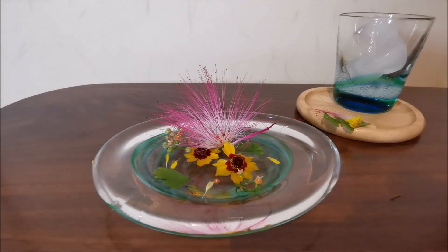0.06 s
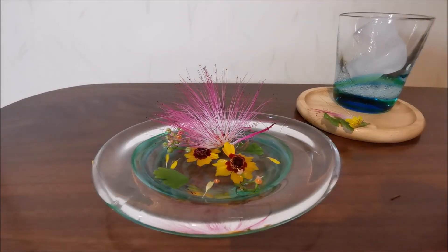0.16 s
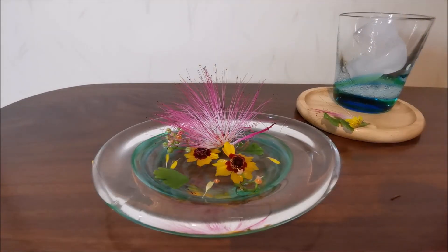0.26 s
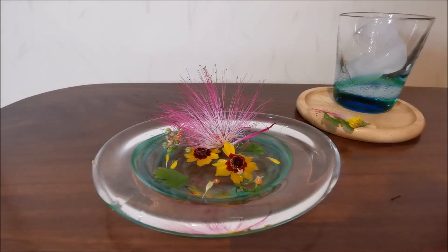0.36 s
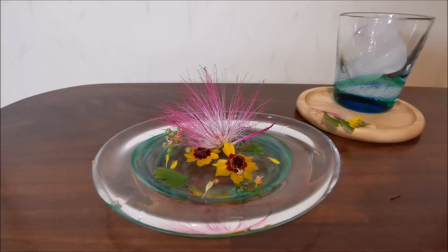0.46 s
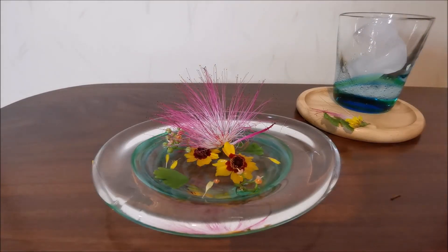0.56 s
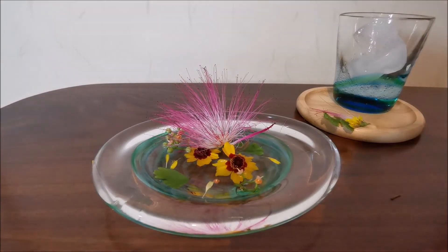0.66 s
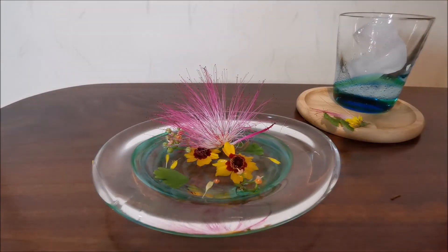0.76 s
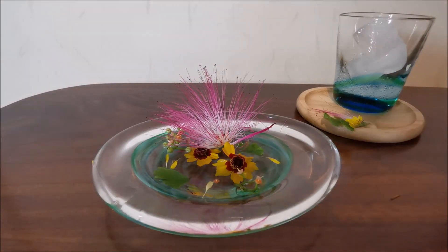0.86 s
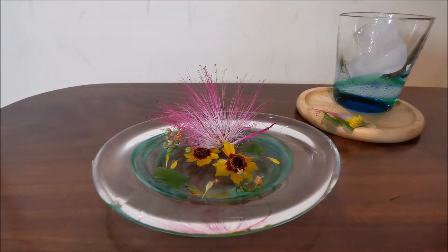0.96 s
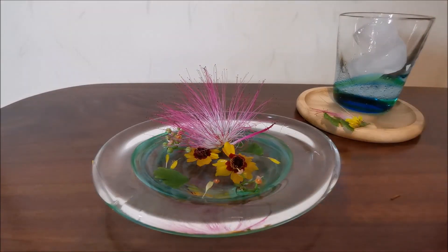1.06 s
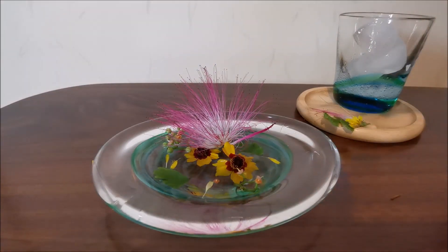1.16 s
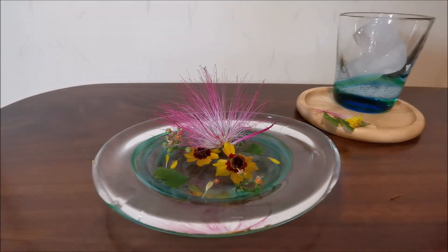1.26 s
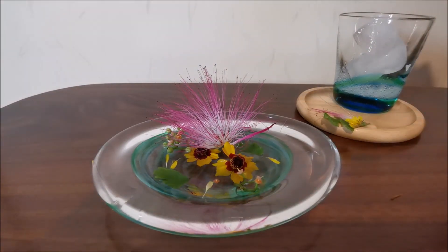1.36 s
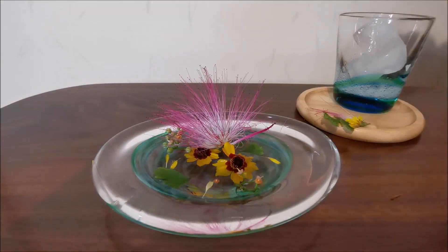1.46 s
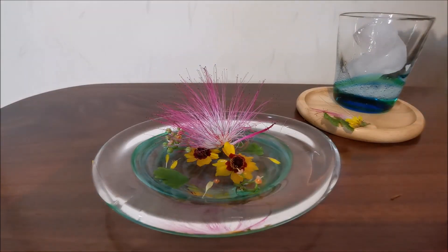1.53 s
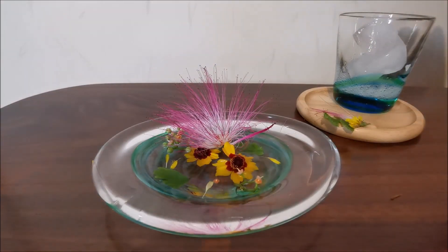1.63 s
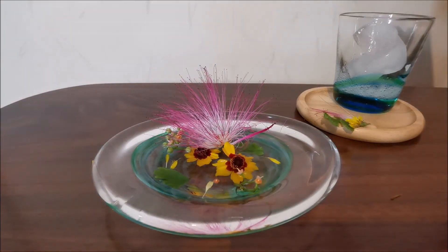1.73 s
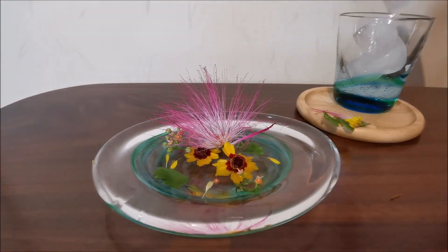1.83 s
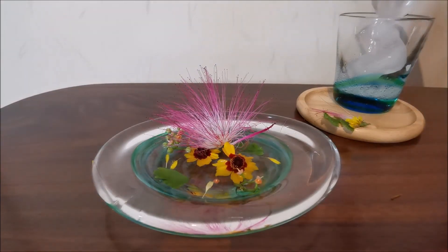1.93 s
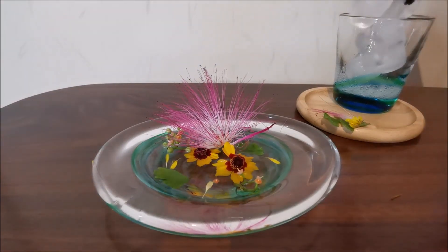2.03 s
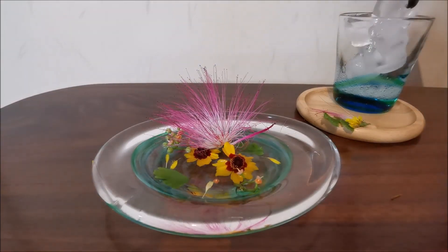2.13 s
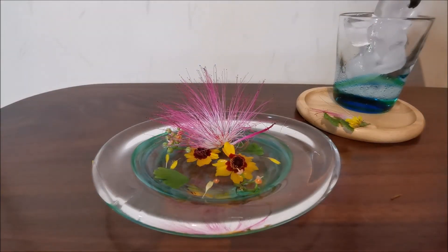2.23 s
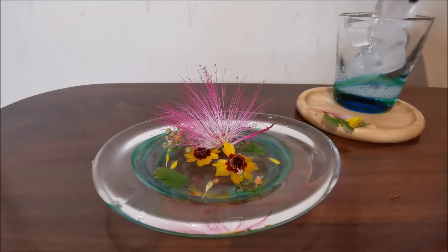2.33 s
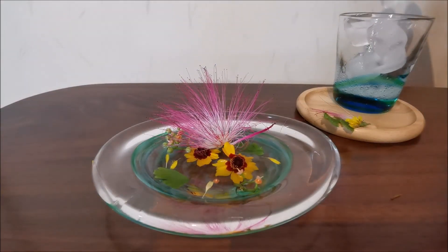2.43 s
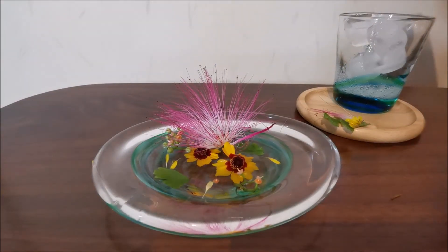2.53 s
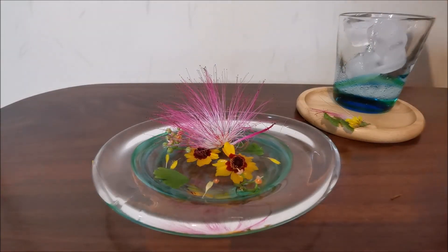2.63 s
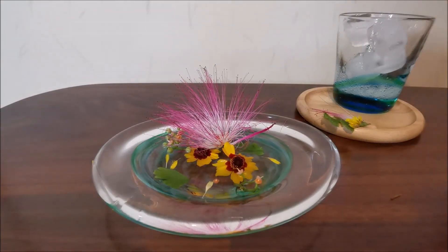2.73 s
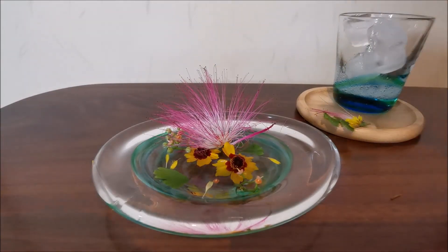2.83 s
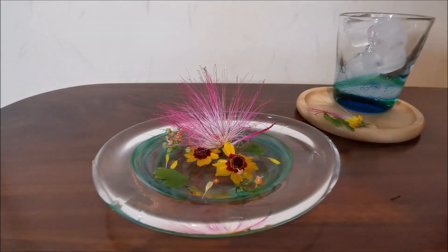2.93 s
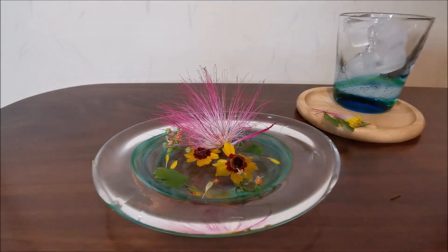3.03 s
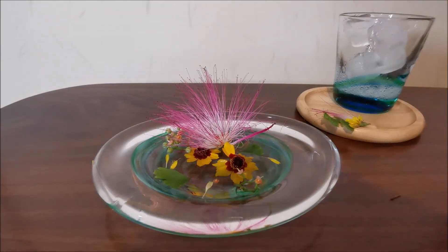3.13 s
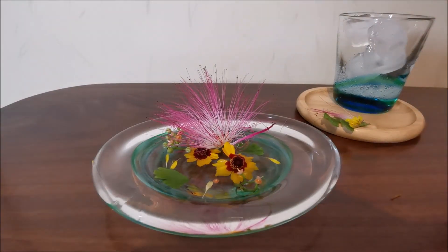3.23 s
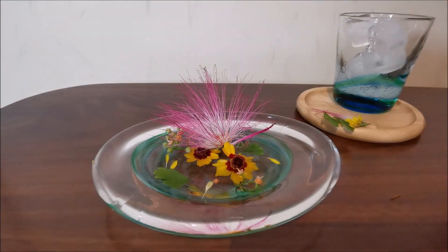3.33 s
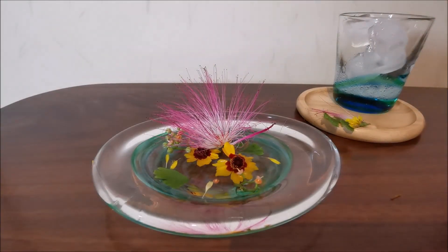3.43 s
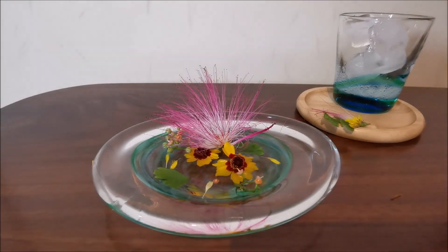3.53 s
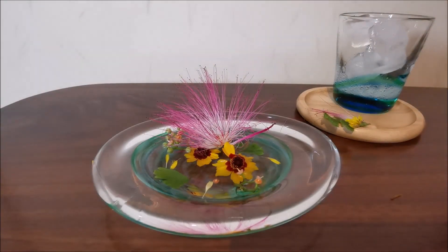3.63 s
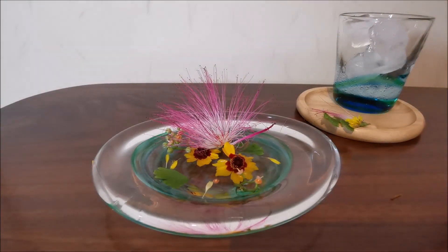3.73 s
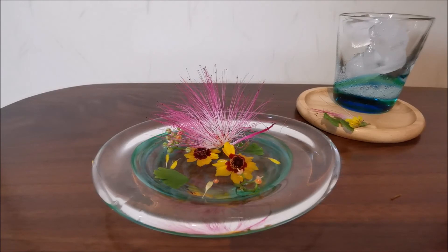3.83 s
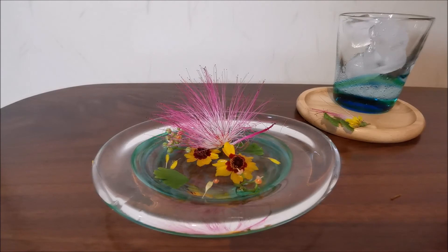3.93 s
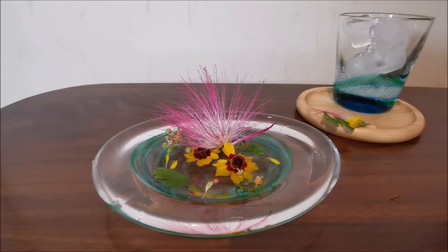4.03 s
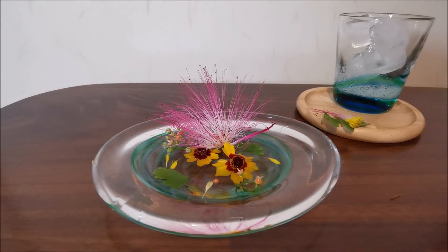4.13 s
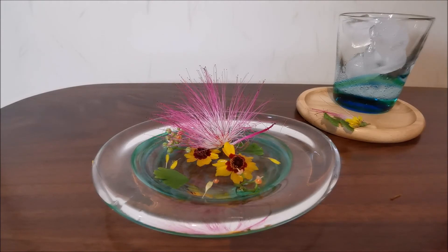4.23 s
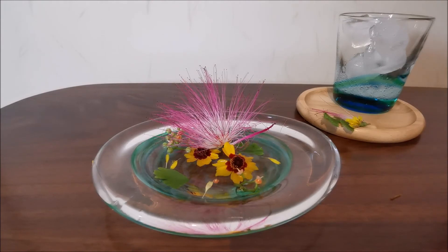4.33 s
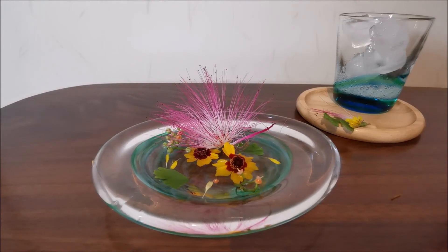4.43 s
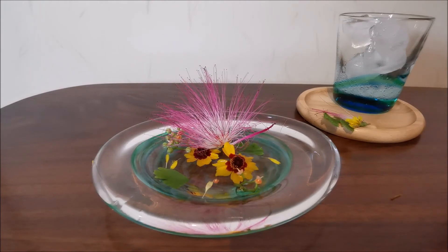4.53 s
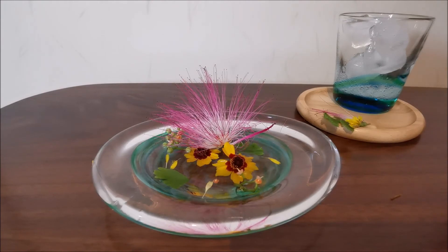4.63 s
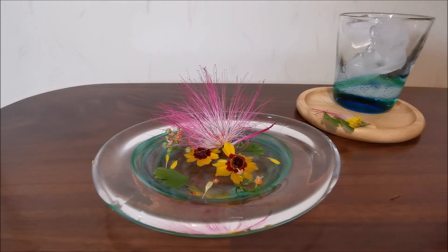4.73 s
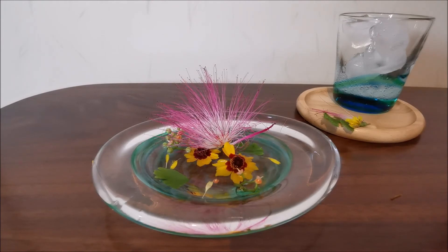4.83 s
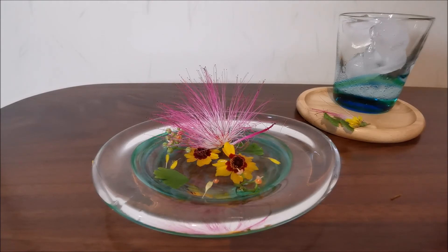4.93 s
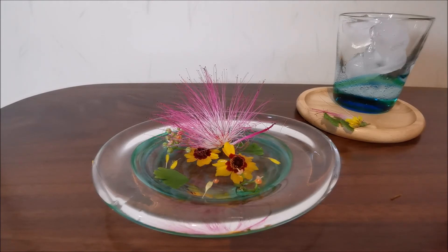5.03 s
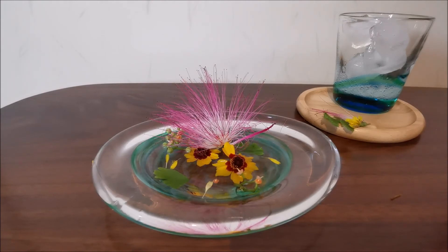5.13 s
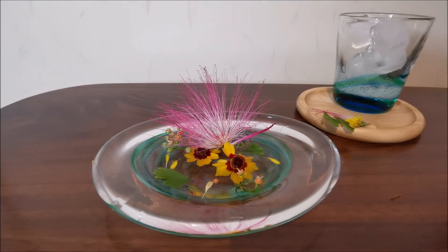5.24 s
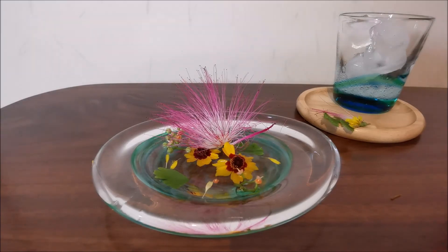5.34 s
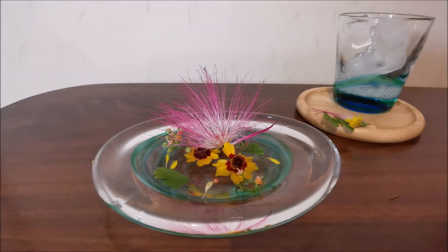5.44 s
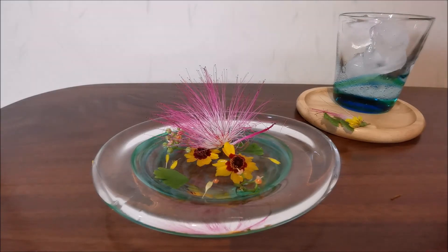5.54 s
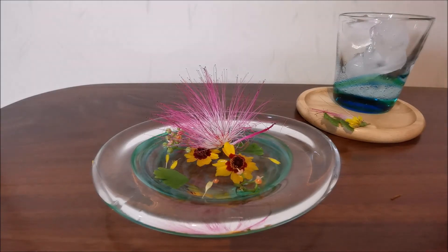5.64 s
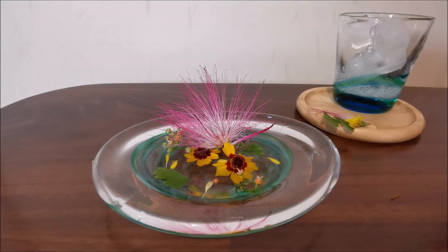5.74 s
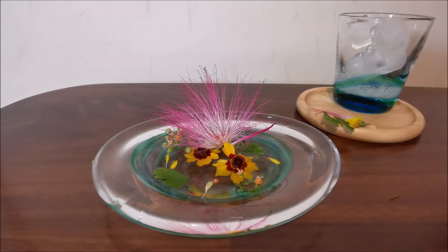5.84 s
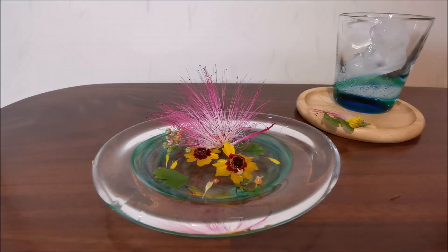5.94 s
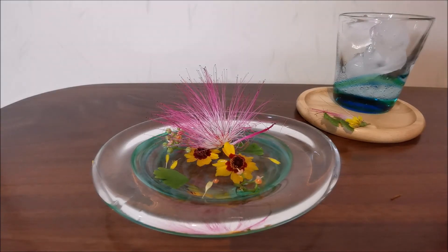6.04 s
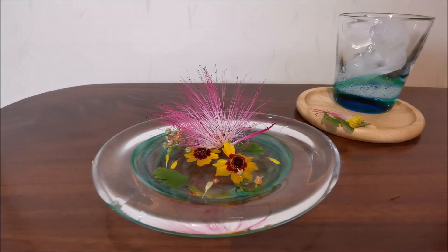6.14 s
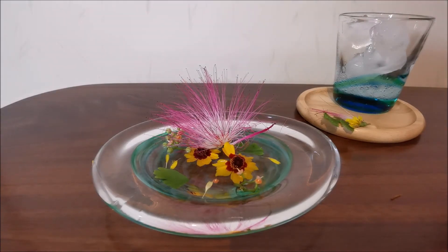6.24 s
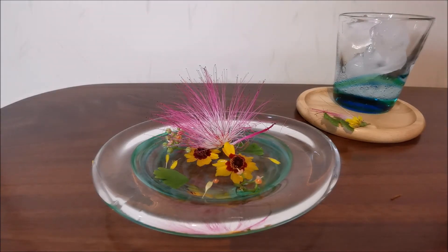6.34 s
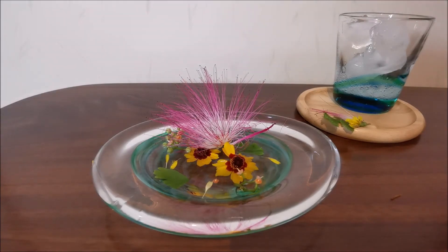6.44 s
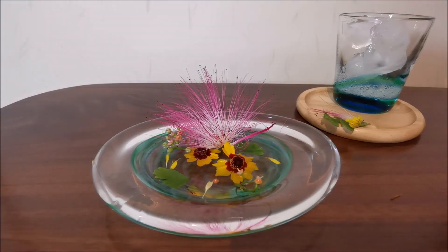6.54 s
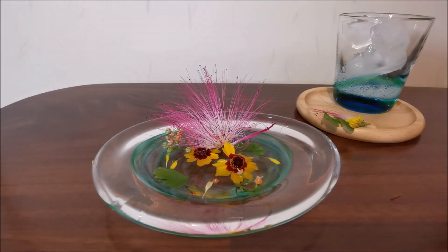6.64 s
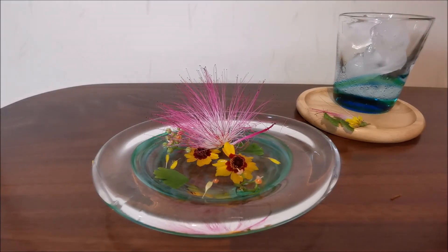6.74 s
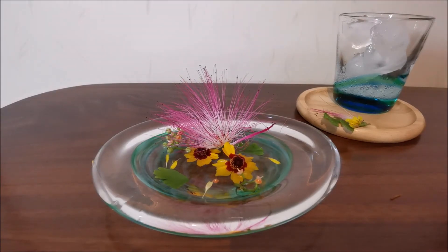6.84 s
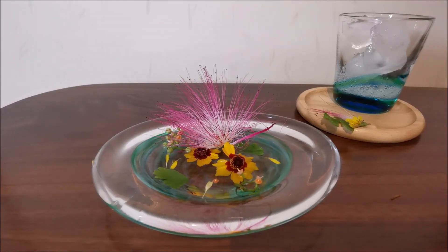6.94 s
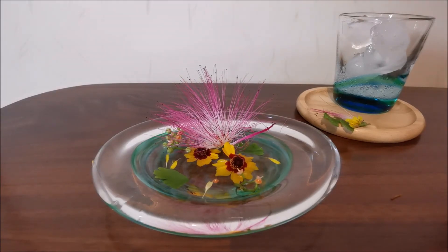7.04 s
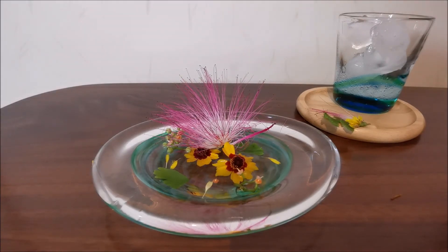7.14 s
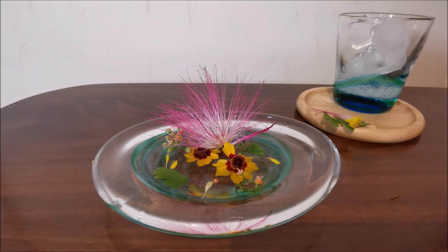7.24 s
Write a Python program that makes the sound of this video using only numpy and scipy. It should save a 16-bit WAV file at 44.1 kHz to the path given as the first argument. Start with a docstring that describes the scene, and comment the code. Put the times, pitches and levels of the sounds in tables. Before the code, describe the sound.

Ice rummaged in a tub, then a cube clatters into a glass tumbler with sharp clinks; metal chinks and a freezer door thud follow.

```python
"""In a small hard room with a low rumble, tongs rummage in a tub of ice, then drop a cube into a tumbler
that stands on a wooden coaster. The cube knocks down the pile and rings the glass wall.
Farther off the ice is stirred again, metal chinks, small things are set down and a freezer door thuds shut.
Blows ring as sums of decaying modes; ticks, rattles and hiss are filtered noise; the rumble is shaped noise.
A dense decaying tail of noise, convolved with every blow and rattle, makes the reverberation."""
import sys
import numpy as np
from scipy import signal
from scipy.io import wavfile
from scipy.ndimage import uniform_filter1d

SR = 44100
rng = np.random.default_rng(int(sys.argv[2]) if len(sys.argv) > 2 else 0)


def unload_wav(signal):
    """Save mono or channel-first audio to the path in sys.argv[1] as 16-bit WAV at rate SR, clipped to [-1, 1]."""
    wavfile.write(
        sys.argv[1],
        SR,
        np.round(np.clip(np.atleast_2d(signal).T, -1, 1) * 32767).astype(np.int16),
    )


N = 321489  # samples in the scene
T = np.arange(SR // 2) / SR  # time within one blow [s]

# Upper resonances of the tub. Each row: frequency in Hz, relative level in dB, t60 in seconds,
# left-right difference in dB, left phase lead in radians.
TUB_HIGH = [(2520, -7.5, 0.023, -4, 7), (2631, 2, .042, -6, 0.44), (2834, -4.5, 0.051, -5, 2.1)]
TUB_PITCH_HZ = TUB_HIGH[1][0]  # the strongest of them


def amp(db):
    """Amplitude ratio of a level: 20 dB is a factor of ten."""
    return 10 ** (np.asarray(db) / 20)


def evened(x):
    """Scale to unit root-mean-square, so that a level sets the power."""
    return x / np.sqrt(np.mean(x ** 2) + 1e-20)


def read(points, hz):
    """Interpolate along a logarithmic frequency axis."""
    f, value = np.transpose(points)
    return np.interp(np.log(hz + 1), np.log(f + 1), value)


def sides(db):
    """Left and right gains for a level difference, shared equally between the channels."""
    return amp(np.array([db, -db]) / 2).reshape(2, -1)


def add(mix, s, sound):
    """Superpose a sound on the mix from s seconds on."""
    part = mix[:, max(round(s * SR), 0):][:, :sound.shape[1]]
    part += sound[:, :part.shape[1]]


def cut(x, hz, kind, order=2):
    """Butterworth high-pass or low-pass: maximally flat in the passband."""
    return signal.sosfilt(signal.butter(order, min(hz, .49 * SR), kind, fs=SR, output="sos"), x)


def ring(modes, free=1, tilt_db=0, pitch=1, contact=0.00024):
    """Modal decay: sines rise over the contact time in s and die exponentially, sooner if less free."""
    centre = np.mean([m[0] for m in modes])
    tones = 0
    for hz, db, t60, pan, lead in modes:
        decay_db = -60 * T / (t60 * max(abs(free), .02))
        envelope = amp(db + tilt_db * np.log2(hz / centre) + decay_db)
        phase = np.array([[lead], [-lead]]) / 2
        tones = tones + envelope * sides(pan) * np.sin(2 * np.pi * hz * pitch * T + phase)
    return tones * (1 - np.exp(-T / contact))


def colour(x, points, tilt_db=0, peaks=(), size=4096):
    """Minimum-phase filter of unit energy: a spectrum, tilted above the bass and lifted at resonances."""
    hz = abs(np.fft.fftfreq(size, 1 / SR))
    db = read(points, hz) + tilt_db * np.log2(1 + hz / 1000)
    db = db + sum(lift / (1 + (2 * (hz - f) / width) ** 2) for f, width, lift in peaks)
    # the Hilbert transform of the log magnitude gives the phase of a causal response
    response = np.exp(np.conj(signal.hilbert(np.log(amp(db)))))
    taps = np.fft.ifft(response).real[:size // 2]
    return signal.fftconvolve(x, taps[None] / np.linalg.norm(taps), axes=1)[:, :x.shape[1]]


def burst(rise, t60):
    """A spray of tiny contacts: noise under an envelope that swells and dies exponentially."""
    shape = (1 - np.exp(-T / max(rise, 1e-5))) * amp(-60 * T / max(t60, 1e-4))
    return rng.standard_normal((2, len(T))) * shape / shape.max()


def paired(z, hz):
    """Spatial coherence: two close points hear the same bass and unrelated treble."""
    # Each row: frequency in Hz, left-right correlation.
    likeness = [(30, 0.98), (200, 0.88), (400, 0.7), (800, .35), (1500, .1), (16000, 0)]
    same = np.clip(read(likeness, hz), -1, 1)[:, None]
    return np.array([z[0], same * z[0] + np.sqrt(1 - same ** 2) * z[1]])


def room(x, build=0.0047):
    """Reverberation as convolution with a dense tail that builds up in s, each band dying at its own rate."""
    # Each row: frequency in Hz, t60 in seconds.
    band_t60 = [(100, 0.56), (350, 0.3), (1000, 0.2), (3000, 0.27), (8000, 0.25), (15000, 0.21)]
    hz, t, z = signal.stft(rng.choice([-1., 1.], (2, len(T))), SR, nperseg=256)
    decay = amp(-60 * t / read(band_t60, hz)[:, None])
    tail = signal.istft(paired(z, hz) * decay, SR, nperseg=256)[1][:, :len(T)]
    tail = tail * (1 - np.exp(-(T / build) ** 2))
    return signal.fftconvolve(x, tail / np.linalg.norm(tail[0]), axes=1)[:, :N]


def background(patchy_db=2.5, hiss_hz=5400, hiss_width_hz=1300, drone_hz=310, drone_width_hz=25):
    """Stationary noise made uneven: house rumble in shifting patches, a drifting hiss, a drone swelling once."""
    # Rumble spectrum. Each row: frequency in Hz, relative level in dB per Hz.
    rumble = [(12, -39.5), (20, -13), (70, 0.5), (101, -13.5), (200, -12.5), (310, -15.5), (434, -25),
              (574, -22.5), (780, -31.5), (1860, -38), (2750, -38.5), (3950, -42.5), (5850, -40.5),
              (7520, -45.5), (10800, -44), (16000, -50)]
    # Left-right balance. Each row: frequency in Hz, level difference in dB.
    lean = [(30, -2.5), (120, 5.5), (500, -2.5), (5000, 0.5), (12000, -5.5)]
    # Lift of the faint hiss at its centre. Each row: time in seconds, lift in dB.
    hiss_drift = [(0, 3), (2.5, -1.5), (6.6, 5)]
    level_db = -57
    drone_db, swell_db, swell_s, swell_width_s = -1, 12, 3.63, .24
    hz, t = np.fft.rfftfreq(2048, 1 / SR), np.arange(N // 512 + 5) * 512 / SR
    a, b = rng.standard_normal((2, 2, len(hz), len(t)))
    patches = uniform_filter1d(rng.standard_normal(a.shape[1:]), size=8, axis=0)
    patches = evened(uniform_filter1d(patches, size=10, axis=1))
    hiss_band = np.exp(-((hz - hiss_hz) / hiss_width_hz) ** 2)[:, None]
    hiss = hiss_band * np.interp(t, *np.transpose(hiss_drift))
    swell = drone_db + swell_db * np.exp(-((t - swell_s) / swell_width_s) ** 2)
    drone = np.exp(-((hz - drone_hz) / drone_width_hz) ** 2)[:, None] * swell
    db = read(rumble, hz)[:, None] + patchy_db * patches + hiss + drone
    z = paired(a + 1j * b, hz) * amp(db) * sides(read(lean, hz))[:, :, None]
    return amp(level_db) * evened(signal.istft(z, nperseg=2048, noverlap=1536)[1][:, :N])


def clatter(rows, spectrum, peaks=(), pan_db=0, blur_s=0.0071):
    """Rattling contact as noise bursts: a slow rise blurs the resonances; more of the farther sound is echo."""
    near, far = np.zeros((2, 2, N))
    for s, db, rise, t60, tilt_db, room_db in rows:
        lifts = [(hz, width, lift / (1 + rise / blur_s)) for hz, width, lift in peaks]
        hit = amp(db) * colour(burst(rise, t60), spectrum, tilt_db, lifts)
        add(near, s, hit)
        add(far, s, amp(room_db) * hit)
    return sides(pan_db) * (near + room(far))


def small_taps():
    """Small things set down farther off: short impacts heard as bursts of band-shaped noise."""
    # Each row: start in seconds, level in dB, rise in seconds, t60 in seconds,
    # brightness in dB per octave, room level relative to the tap in dB.
    taps = [(5.326, -51.5, 0.00091, 0.023, 2.5, 0.5), (5.361, -47, 0.00077, 0.019, 2, -1),
            (5.455, -57.5, .001, 0.028, -4, 0.5), (5.583, -60, 0.0009, 0.02, -18, -7),
            (6.537, -65, 0.0026, 0.046, -4.5, 5.5), (6.632, -65, 0.0018, 0.043, -3, 9),
            (6.726, -67, .001, 0.029, 6, 1.5)]
    # Each row: frequency in Hz, relative level in dB per Hz.
    tap_spectrum = [(300, -48), (800, -6.5), (1150, 2.5), (1500, -6.5), (2100, -2), (2900, -9.5),
                    (3600, -5.5), (4500, -21), (8000, -25), (16000, -45)]
    return clatter(taps, tap_spectrum)


def door(squeeze=0.011, room_db=-19):
    """A compliant seal spreads the blow over some milliseconds (squeeze in s); the cabinet's modes boom on."""
    # Each row: start in seconds, level in dB.
    shuts = [(5.6889, -7.5)]
    # Cabinet modes. Each row: frequency in Hz, relative level in dB, t60 in seconds,
    # left-right difference in dB, left phase lead in radians.
    cabinet = [(124.8, 7, 0.06, 4.5, 0.37), (152.3, -14.5, 0.38, 3.5, 0.27), (76.2, -14, 0.26, 1.5, .2),
               (105, -14, 0.13, 14, 0.25), (424, -36, 0.36, -29, 0)]
    out = np.zeros((2, N))
    for s, db in shuts:
        add(out, s, amp(db) * ring(cabinet, contact=squeeze))
    return out + amp(room_db) * room(out)


def freezer():
    """Impact and rattle: the thud and rattle of the shutting door, a few small taps around it, and the catch."""
    # Rattle of the shutting door with a few small taps before and after it; then the catch.
    # Each row: start in seconds, level in dB, rise in seconds, t60 in seconds,
    # brightness in dB per octave, room level relative to the hit in dB.
    clacks = [(5.26, -61, 0.00082, 0.017, 0, 1), (5.689, -27, 0.0013, 0.045, -2.5, -4),
              (5.693, -20, 0.00059, 0.025, -2, -1.5), (6.301, -60, 0.0011, 0.027, 0, 1.5),
              (6.585, -46, 0.0016, 0.031, -6, -0.5)]
    catches = [(5.7503, -23.5, 0.00019, 0.04, 0, -0.38)]
    # Their spectra. Each row: frequency in Hz, relative level in dB per Hz.
    clack_spectrum = [(180, -34), (300, -10), (405, -3), (689, -9.5), (749, -19), (842, -8), (1030, -10.5),
                      (1080, -12.5), (1870, -15.5), (2030, -4.5), (3640, -16), (4370, -5.5), (6520, -10.5),
                      (9390, -8), (16000, -17)]
    catch_spectrum = [(180, -45), (300, -24), (447, -1), (762, -8.5), (842, -2.5), (1150, -16), (2250, -6),
                      (3830, -13.5), (4520, -13.5), (10400, -15.5), (16000, -27)]
    # resonances: Hz, width Hz, lift dB before the blur
    clack_peaks, catch_peaks = [(1664, 224, 10.2), (4410, 194, 6.7)], [(1690, 170, 10.0)]
    rattle_and_taps = clatter(clacks, clack_spectrum, clack_peaks, pan_db=-1.0)
    return door() + rattle_and_taps + clatter(catches, catch_spectrum, catch_peaks)


def chinks():
    """Bright metal contacts: noise bursts coloured by the resonances of thin steel."""
    # Each row: start in seconds, level in dB, rise in seconds, t60 in seconds,
    # brightness in dB per octave, room level relative to the chink in dB.
    hits = [(3.4325, -23, .001, 0.021, 4.5, -10), (4.237, -51.5, .001, 0.063, -3, 3),
            (4.295, -41.5, .001, 0.045, -1, 4.5), (4.388, -45, .004, 0.072, -4.5, -2.5),
            (4.4, -39, .003, 0.044, -1.5, 5), (4.491, -34.5, 0.0089, 0.075, 0, 3),
            (4.501, -27.5, .005, 0.17, 13, -2.5), (4.812, -65, .003, 0.055, -5, 0.5)]
    # Each row: frequency in Hz, relative level in dB per Hz.
    metal_spectrum = [(300, -28.5), (1200, -25), (2100, -19.5), (2600, -7.5), (3300, -19), (5000, -11),
                      (7000, -9), (9000, -6.5), (10500, -6), (13000, -6), (16000, -12)]
    # Resonances of thin steel. Each row: frequency in Hz, width in Hz, lift in dB before the blur.
    steel_peaks = [(2600, 300, 4), (4880, 220, 8), (5720, 130, 7), (6560, 300, 10), (8350, 300, 11),
                   (9330, 200, 12), (10330, 250, 9), (11350, 250, 12), (11950, 150, 6), (12230, 130, 6),
                   (12950, 300, 11), (13480, 130, 7)]
    return clatter(hits, metal_spectrum, steel_peaks, pan_db=-1)


def cutlery(room_db=-5):
    """Lightly damped thin steel: the modes of tongs and spoon ring on after metal chinks."""
    # Each row: start in seconds, tongs level in dB, spoon level in dB.
    rings = [(3.431, -35, -76), (3.475, -53.5, -80), (4.402, -54.5, -43), (4.509, -75, -35.5)]
    # Modes of the tongs and of a steel spoon. Each row: frequency in Hz, relative level in dB,
    # t60 in seconds, left-right difference in dB, left phase lead in radians.
    tongs = [(2550, 0, .12, -5, -.3), (3790, -19, .06, -2, 1), (5055, -16, .09, -2, 0),
             (8330, -5, .07, -2, 1), (11300, -1, .06, -4, -1), (13000, 1, .05, -5, 0),
             (13420, -5, .07, -5, 1), (15030, -6, .045, -5, 0)]
    spoon = [(2545, -11, .17, 0, 2), (2745, -12, .17, 0, -1), (9512, -4, .15, -2, 0),
             (10325, -1, .17, -2, 0), (10411, 0, .17, -2, .5), (10567, -3, .15, -3, -1),
             (11300, -3, .16, -3, 1), (12225, -1, .15, -3, 0), (13040, -1, .17, -4, -1),
             (14093, -6, .15, -4, 0), (14610, -3, .16, -4, 1), (15682, -7, .14, -4, 0)]
    out = np.zeros((2, N))
    for s, tongs_db, spoon_db in rings:
        add(out, s, amp(tongs_db) * ring(tongs) + amp(spoon_db) * ring(spoon, contact=.004))
    return out + amp(room_db) * room(out)


def stirring(t):
    """How hard the ice moves, as a sum of powers: each push builds up, then the pile settles at a steady rate."""
    # Pushes of the tongs. Each row: time of the peak in seconds, peak level in dB,
    # seconds of build-up per 10 dB, fading in dB per second.
    strokes = [(.25, -57, 0.82, 51), (.98, -76, 0.25, 22), (3.165, -49.5, 0.0061, 92),
               (3.67, -68, 0.037, 105), (3.89, -72.5, 0.049, 95)]
    power = 0
    for s, db, build, fade in strokes:
        before, after = np.maximum(s - t, 0), np.maximum(t - s, 0)
        power = power + amp(db - 10 * before / build - fade * after) ** 2
    return np.sqrt(power)


def jostles():
    """Small knocks as a random point process whose strength follows the stirring; rows as in the tub's knocks."""
    per_s, level_db, spread_db, detune = 24, 7, 1.5, 0.034  # level over the stirring; detune as a fraction
    chance, strength, low, pitch = rng.random((4, N))
    moving = stirring(np.arange(N) / SR) > amp(-80)
    rows = []
    for i in np.flatnonzero((chance < per_s / SR) & moving):
        db = 20 * np.log10(stirring(i / SR)) + level_db + spread_db * (2 * strength[i] - 1)
        hz = TUB_PITCH_HZ * (1 + detune * (2 * pitch[i] - 1))
        rows.append((i / SR, db - 12 * low[i], db, db - 17, hz))
    return rows


def tub(low_db=0, high_db=1, crack_db=6, crack_t60=0.027, cube_db=0, slips_per_s=520, hollow_db=-1,
        grain_db=3, slide_hiss_db=-9, room_db=-11, crack_room_db=-4):
    """Knocks and slips excite resonances that shift as the ice moves; cubes crack and ring; sliding ice hisses."""
    # Clearest knocks. Each row: start in seconds, then relative levels in dB of low body, high body
    # and crack, pitch of the high body in Hz.
    knocks = [(0.0750, -49.5, -42, -64, 2624), (0.1072, -48, -46, -57.5, 2560),
              (0.1658, -45, -45, -58.5, 2630), (0.2005, -61, -46, -46.5, 2950),
              (0.2087, -42, -36.5, -64, 2730), (0.243, -54, -32, -44, 2570), (0.2707, -40, -35, -49, 2540),
              (0.3225, -70, -45.5, -55, 2740), (0.409, -65, -46.5, -65, 2510), (0.421, -53, -48, -80, 2710),
              (0.4593, -66, -52.5, -78, 2530), (0.5176, -68, -50, -71, 2530),
              (0.566, -53.5, -47.5, -65, 2580), (0.6168, -56, -50, -64.5, 2580),
              (0.7726, -51, -50.5, -58.5, 2730), (0.9806, -38.5, -54, -46, 2733),
              (0.9999, -53, -47, -59, 2680), (1.2388, -60, -63.5, -79, 2660), (1.4076, -61, -58, -73, 2710),
              (3.1513, -43.5, -50, -65, 2600), (3.1584, -38.5, -43, -54.5, 2720),
              (3.1753, -40.5, -48, -59, 2730), (3.201, -43, -47, -49.5, 2780),
              (3.2055, -54, -35.5, -62, 2700), (3.234, -46.5, -66, -59.5, 2630),
              (3.261, -65, -45, -71, 2550), (3.6469, -51, -50, -67.5, 2750), (3.6754, -53, -58, -76, 2800)]
    # Low resonances of the tub, then modes of a loose cube. Each row: frequency in Hz, relative level in dB,
    # t60 in seconds, left-right difference in dB, left phase lead in radians.
    tub_low = [(655, -20, 0.036, 0.91, .3), (1187, -7, .03, 0.079, 0.52), (1197, -3.5, 0.04, 0.018, 1.2),
               (1270, -5, 0.027, 0.01, 1.5)]
    cube = [(4140, -1.5, 0.013, 21, -1), (5720, -6, 0.028, 17, 1), (6310, 0, 0.021, 4, 0)]
    # Each row: frequency in Hz, relative level in dB per Hz.
    ice_spectrum = [(300, -14), (700, -5.5), (1300, -3), (1800, -1.5), (3000, 1), (3600, -5), (4300, 1),
                    (6200, -6), (7500, -7), (11000, -8.5), (16000, -21)]
    out, cracks = np.zeros((2, 2, N))
    body, shifts = 0, np.linspace(.93, 1.07, 7)
    for shift in shifts:
        slips = rng.standard_normal((1, N)) * (rng.random(N) < slips_per_s / len(shifts) / SR)
        resonance = ring(TUB_HIGH, pitch=shift) + amp(hollow_db) * ring(tub_low, pitch=shift)
        body = body + signal.oaconvolve(slips, resonance, axes=1)[:, :N]
    # quick random swings of level, a few milliseconds long, make the hiss grainy
    grain = amp(grain_db * evened(uniform_filter1d(rng.standard_normal(N), size=120)))
    hiss = evened(colour(grain * rng.standard_normal((2, N)), ice_spectrum, tilt_db=6.5))
    out += (evened(body) + amp(slide_hiss_db) * hiss) * stirring(np.arange(N) / SR)
    for s, low, high, crack, hz in knocks + jostles():
        shift = hz / TUB_PITCH_HZ
        low_body = amp(low + low_db) * ring(tub_low, pitch=shift)
        add(out, s, low_body + amp(high + high_db) * ring(TUB_HIGH, pitch=shift))
        snap = amp(crack_db) * colour(burst(0.00014, crack_t60), ice_spectrum)
        add(cracks, s, amp(crack) * (snap + amp(cube_db) * ring(cube, pitch=np.sqrt(shift))))
    return out + cracks + room(amp(room_db) * out + amp(crack_room_db) * cracks)


def tumbler(tick_t60=0.016, tick_pan_db=-5, airborne=0.013, settle_db=-8, body_room_db=-13,
            wall_room_db=-10, small_hz=115, soft_hz=14000):
    """Separate modes struck together: each blow rocks glass on coaster, sounds the hollow between cubes
    and rings the wall."""
    # The cube's blows. Each row: start in seconds, then relative levels in dB of coaster, hollow, wall
    # and tick, freedom of the wall to ring from 0 to 1, wall brightness in dB per octave.
    drops = [(1.9473, -15, -25.5, -27, -24, 0.52, 12), (1.973, -20, -38.5, -48, -49, 1, -2),
             (1.9903, -22, -37.5, -55, -51, 0.6, -4.5), (1.9946, -18, -27, -37.5, -35, .38, -6),
             (2.0713, -19.5, -15.5, -39, -30, 0.74, -4.5), (2.077, -23.5, -19.5, -53.5, -52, .1, 1.5),
             (2.0947, -28.5, -24.5, -18.5, -19.5, 1, 0.5), (2.1513, -36.5, -38.5, -34.5, -30, 0.43, -4),
             (2.1892, -31.5, -33, -61, -43, .2, 1), (2.195, -29.5, -21.5, -29.5, -28, 0.31, 1),
             (2.3825, -60, -45.5, -61, -41.5, 0.4, -18), (2.4512, -49, -33.5, -57, -49, .86, 6)]
    # The cube comes to rest. Each row: start in seconds, rocking of the glass in dB, glassy shimmer in dB.
    settles = [(2.195, -38, -40.5)]
    # The ice cracks in the glass. Each row: start in seconds, level in dB.
    ice_cracks = [(2.049, -41), (2.895, -47.5), (2.944, -55.5), (6.486, -54), (7.185, -58)]
    # Modes of coaster, hollow and wall. Each row: frequency in Hz, relative level in dB,
    # t60 in seconds (the wall's when free), left-right difference in dB, left phase lead in radians.
    coaster = [(175, -14, .05, 0, -.1), (258, -10, .035, -1, -.2), (312, 0, .04, -1, -.2),
               (390, -23, .06, 0, -.3), (530, -26, .1, -1, -.3), (672, -16, .07, -1, -.6),
               (770, -15, .02, 0, -.7), (880, -20, .04, 0, -.7)]
    hollow = [(1260, -14, 0.023, 0.0043, 0.7), (1511, 2, 0.022, 0.015, 0.34),
              (1600, -8.5, .018, 0.0013, 0.18), (2090, -22.5, 0.0679, 0.0079, -1.5)]
    glass = [(4619, -6, .095, 0, 0), (5150, -22, .04, -2, 1), (7877, 0, .056, -10, -1.8),
             (8230, -13, .04, -9, 1), (8690, -20, .05, -8, 0), (9050, -15, .03, -9, 2),
             (11300, -21, .025, -6, 0), (12972, -13, .085, -6, -2.1), (13200, -15, .05, -7, 1.4)]
    # Each row: frequency in Hz, relative level in dB per Hz.
    tick_spectrum = [(300, -4), (1500, 0.5), (2600, -7), (4500, -4), (6500, -9), (8500, -2), (11000, -15.5),
                     (13300, -6), (14500, -27.5), (16000, -34.5)]
    shimmer_spectrum = [(500, -2.0), (2500, -13), (3200, -5), (3680, 8), (4100, -6), (5000, -9), (9000, -33)]
    body, wall = np.zeros((2, 2, N))
    # after airborne seconds the cube falls back against the wall
    damped = amp(settle_db * np.clip((T - airborne) / .004, 0, 1))
    for s, coaster_db, hollow_db, wall_db, tick_db, free, tilt_db in drops:
        add(body, s, amp(coaster_db) * ring(coaster, contact=.0007))
        add(body, s, amp(hollow_db) * ring(hollow, contact=0.00094))
        add(wall, s, amp(wall_db) * ring(glass, free, tilt_db) * damped)
        add(wall, s, amp(tick_db - 4) * sides(tick_pan_db) * colour(burst(.0001, tick_t60), tick_spectrum))
    for s, rocking_db, shimmer_db in settles:
        add(body, s, amp(rocking_db) * ring([(308, 0, .33, 2, -.2)]))
        add(wall, s, amp(shimmer_db) * colour(burst(.0003, 0.21), shimmer_spectrum))
    for s, db in ice_cracks:
        crack = colour(burst(.0001, 0.0017), tick_spectrum, tilt_db=7.5)
        add(wall, s, amp(db) * sides(tick_pan_db) * crack)
    # a small body radiates little bass, and wet ice is too soft to drive the top treble
    body, wall = cut(body, small_hz, "high"), cut(wall, soft_hz, "low", order=12)
    return body + wall + amp(body_room_db) * room(body) + amp(wall_room_db) * room(wall)


def scene():
    """Linear superposition of all sources."""
    metal = chinks() + cutlery()
    return background() + small_taps() + freezer() + metal + tub() + tumbler()


def record(dry):
    """Band limit: a linear-phase low-pass removes the top treble."""
    edge_hz = 16050
    lowpass = signal.firwin(401, edge_hz, window=("kaiser", 9), fs=SR)
    return signal.oaconvolve(dry, lowpass[None], "same")


dry = scene()
out = record(dry)
unload_wav(out)
```